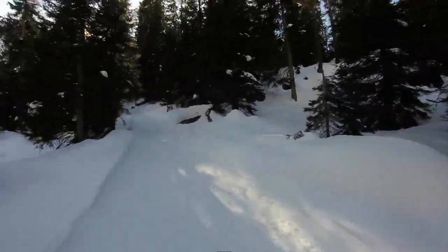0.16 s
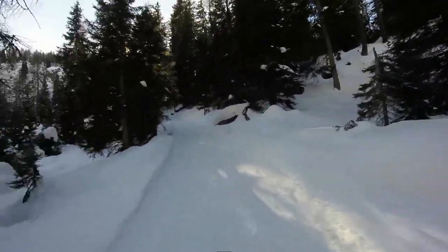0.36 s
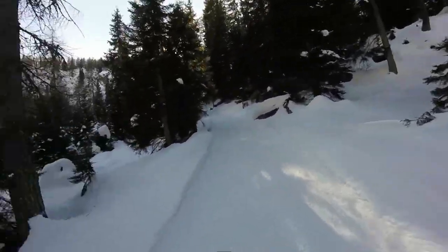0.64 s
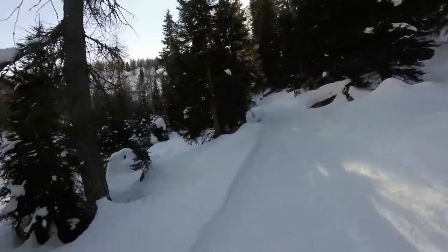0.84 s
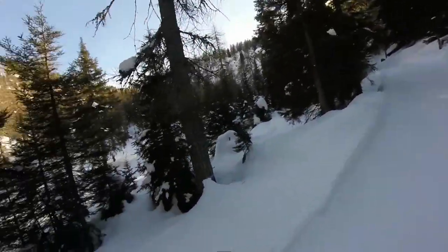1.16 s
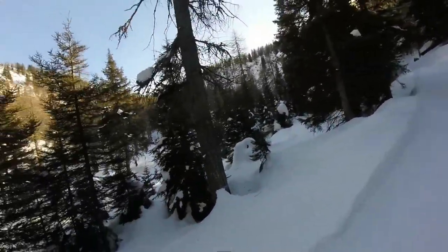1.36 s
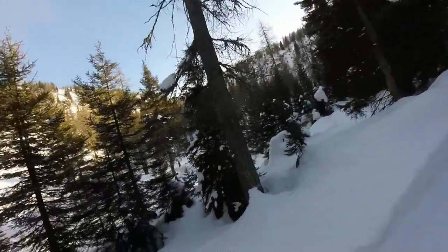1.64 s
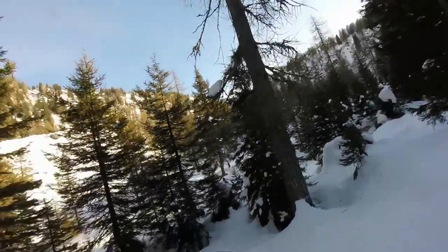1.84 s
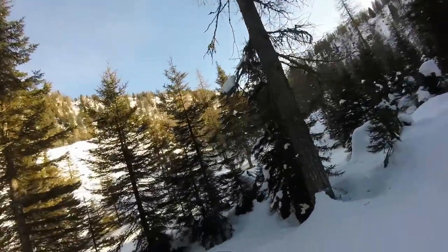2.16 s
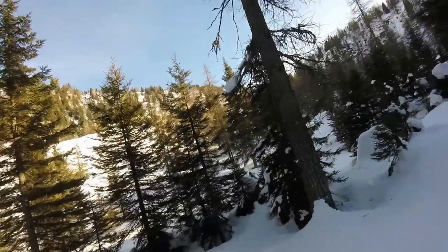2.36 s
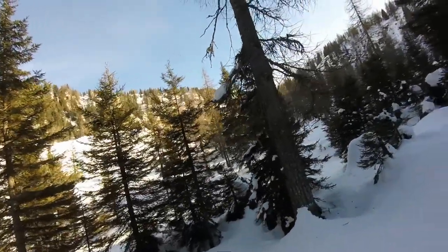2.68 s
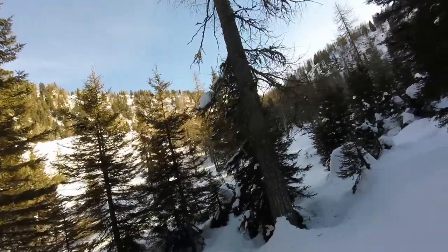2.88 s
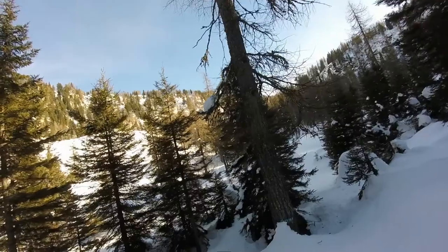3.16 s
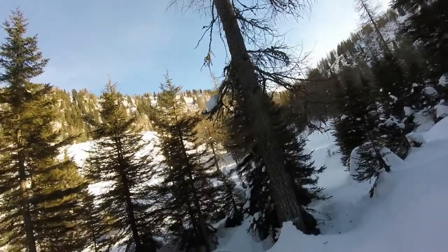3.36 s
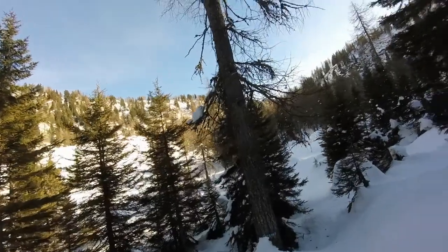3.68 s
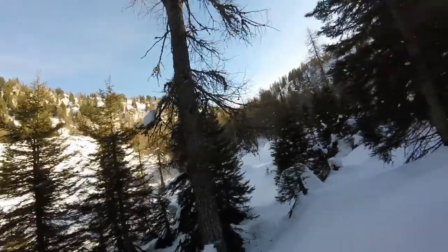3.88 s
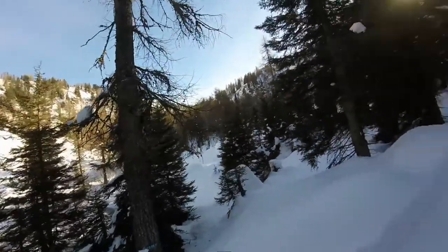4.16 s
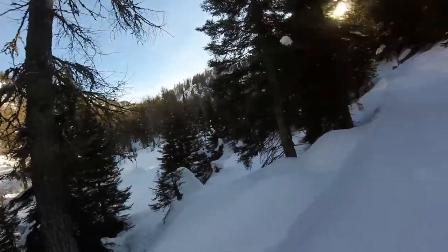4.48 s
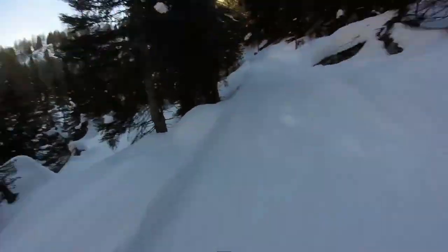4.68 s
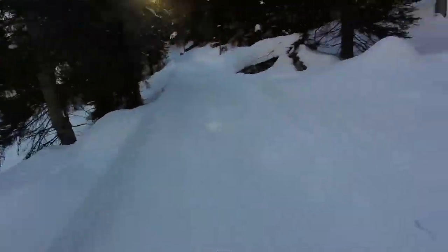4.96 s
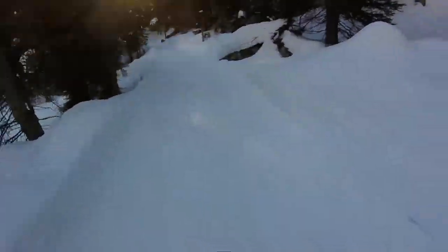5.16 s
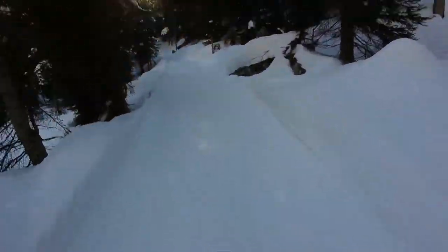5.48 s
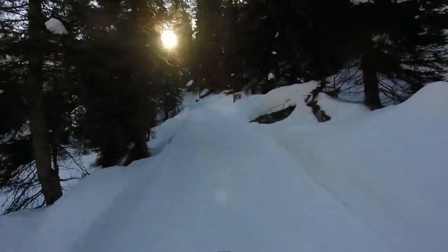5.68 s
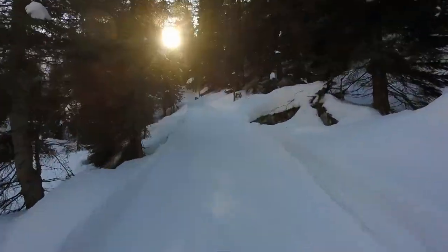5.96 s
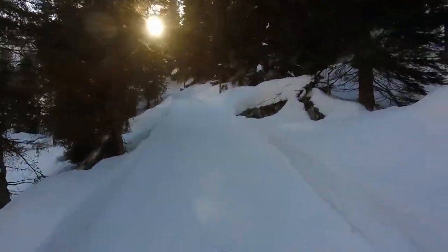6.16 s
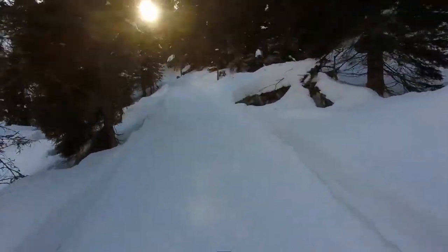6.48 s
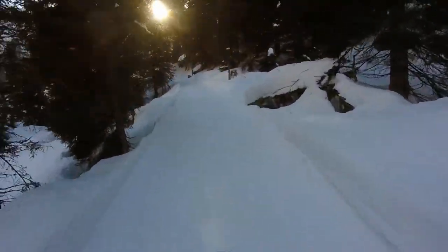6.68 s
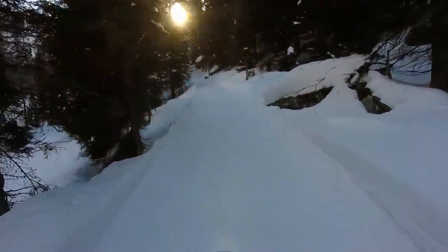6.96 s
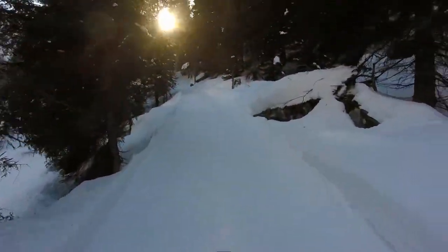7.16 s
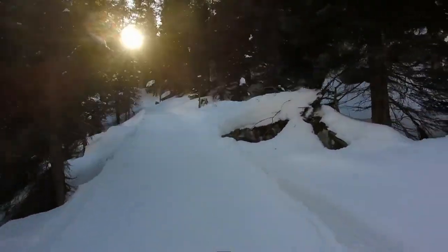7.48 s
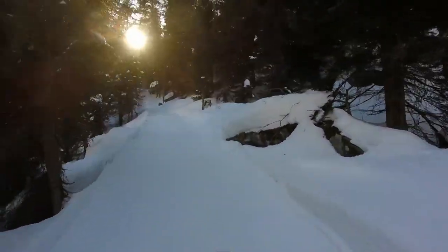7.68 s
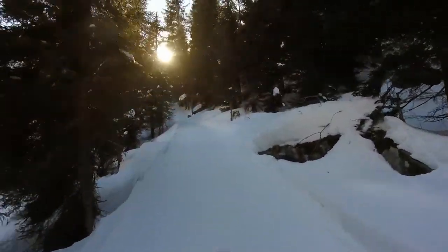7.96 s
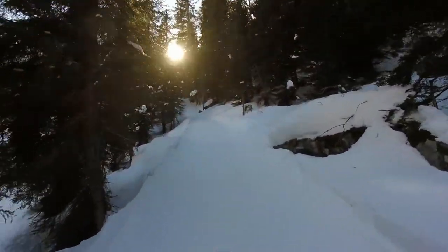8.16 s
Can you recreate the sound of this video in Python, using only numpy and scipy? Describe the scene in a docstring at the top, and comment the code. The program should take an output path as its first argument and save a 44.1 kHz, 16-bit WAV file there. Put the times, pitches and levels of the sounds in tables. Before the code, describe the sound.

One person walks a quiet snowy forest trail, boots clicking and crunching about every 0.6 seconds, while the carried camera rumbles softly.

```python
"""Footsteps on packed snow

Someone walks along a trail of cold packed snow with a camera in a closed plastic case.
Each footfall starts with a sharp click, a hard break and a brief slip, and sinks on in a squeaky crunch of
clumped grains; the case colours both with its resonances. A few landings add a short pitched chirp.
The walker's sway shakes the camera into a low rumble of shaped noise, with brief low swings for the jolts.
A faint steady hiss of shaped noise lies underneath."""
import sys
import numpy as np
from scipy import signal
from scipy.fft import rfft, irfft, next_fast_len
from scipy.io import wavfile
from scipy.ndimage import uniform_filter1d, map_coordinates

SR = 44100
rng = np.random.default_rng(int(sys.argv[2]) if len(sys.argv) > 2 else 0)


def store_pcm(level_fs):
    """Save levels as 16-bit WAV."""
    pcm = np.round(np.clip(level_fs, -1, 1) * 32767).astype(np.int16)
    wavfile.write(sys.argv[1], SR, np.atleast_2d(pcm).T)


N = 366912

# Colour of still air and microphone noise: frequency_hz, relative_level_db
HISS_COLOUR = [(20, 14.5), (90, 2.5), (160, 3), (300, 1), (600, -2), (1100, -6), (2000, -9.5), (4000, -14),
               (6400, -18), (9500, -23), (12000, -27), (15000, -37.5)]
# Rustle of walking, before its hush and drift: start_s, level_db
RUSTLE = [(0, -66.5), (.75, -71), (1.5, -66.5), (2.3, -71.5), (3, -68.5), (3.6, -72.5), (4.3, -69.5),
          (5, -67), (5.65, -68), (6.3, -70.5), (6.9, -69), (7.5, -65.5), (8.3, -67.5)]
# Colour of the camera's quick shiver: frequency_hz, relative_level_db
SHIVER_COLOUR = [(10, -59), (25, -0.5), (40, -7.5), (52, -7), (62, -5.5), (80, -21), (110, -31), (180, -45),
                 (400, -55), (900, -120)]
# Colour of the camera's slow sway: frequency_hz, relative_level_db
SWAY_COLOUR = [(8, -28), (20, -1), (35, -4.5), (48, -2.5), (65, -14.5), (100, -26), (180, -35.5),
               (400, -42), (900, -120)]
# Colour of the case knocked in the hand: frequency_hz, relative_level_db
THUD_COLOUR = [(25, -38), (45, -7), (62, 1.5), (85, -11), (120, -23.5), (200, -29), (500, -75)]
# Share of quick shiver, as against slow sway: start_s, share_0_to_1
STIFFNESS = [(0, 0.2), (1.2, 0.16), (2.2, 0.93), (3.4, 1), (4.6, 0.61), (5.3, 0), (8.3, 0)]
# Thumps that jolt the camera: centre_s, swing_peak_db, pitch_hz, half_length_s
JOLTS = [(0.08, -38, 45.3, 0.036), (0.506, -34, 53.3, 0.028), (0.578, -27.5, 29.2, 0.017),
         (1.152, -28.5, 28, 0.014), (1.203, -32.5, 23, 0.021), (1.67, -25.5, 47, 0.018),
         (1.713, -25, 42.7, 0.019), (2.191, -29, 57, 0.034), (2.255, -27.5, 52.5, 0.036),
         (2.707, -32, 48, 0.019), (2.853, -21.5, 54.7, 0.027), (2.974, -28, 49, 0.01),
         (3.078, -30, 43.7, 0.021), (3.454, -34.5, 51.7, 0.046), (3.481, -27.5, 35.5, 0.032),
         (4.046, -27.5, 43, 0.036), (4.428, -38.5, 35.2, 0.039), (4.651, -36, 41, 0.041),
         (4.724, -39.5, 45, 0.029), (4.82, -35, 25.5, 0.023), (5.366, -31.5, 26.4, 0.012),
         (5.445, -34.5, 27, 0.035), (6.029, -31.5, 26.6, 0.025), (6.58, -31, 38.4, 0.016),
         (6.647, -34, 27.3, 0.013), (7.01, -37.5, 48.7, 0.012), (7.759, -25, 35.7, 0.0088)]
# Resonances of the camera case: pitch_hz, width_hz, gain_db
CASE = [(1383, 144, -2), (1577.6, 177, 6.5), (1643, 190, 1.5), (2024, 155, -1.5), (2330, 128, 2.5),
        (2553, 126, 2.5), (2771, 69, 2), (2992, 118, 2), (3562, 147, -1.5), (3962, 108, 1),
        (4600, 310, -13.5), (5350, 73, -20), (5650, 370, -28), (6370, 110, -13), (9450, 480, -23)]
# Low, middle, bright and snap bands of a click's ring: bottom_hz, top_hz
RING_BANDS = [(1200, 1870), (1870, 3320), (3320, 4250), (4250, 8000)]
# The part of a click that comes straight through the case wall: bottom_hz, top_hz
CRACK_BAND = (690, 3750)
# Colour of breaking snow grains: frequency_hz, gain_db
GRAIN_COLOUR = [(500, -12), (1100, -6.5), (1500, 3.5), (1900, 0.5), (2400, -1.5), (3000, -5.5), (4000, -9),
                (6400, 2.5), (10000, -13), (15000, -43)]
# Colour of loose crystals: frequency_hz, gain_db
POWDER_COLOUR = [(900, 2), (2000, -4), (4500, -14), (7000, -13.5), (10000, -6.5), (15000, -54)]
# Treble of the snow along the trail, before its flicker: start_s, gain_db
CRISPNESS = [(.5, 2.5), (1.1, 0), (1.6, 3), (3.4, 3.5), (5.3, 1), (6.5, -0.5), (8.2, -1)]
# Small scuffs of snow between the landings: centre_s, level_db, spread_s
SCUFFS = [(0.296, -62.5, 0.0041), (0.406, -61, .006), (0.513, -56, 0.011), (0.565, -61, .002),
          (0.652, -59, 0.0055), (0.695, -59, .005), (.735, -61, .003), (0.962, -64, .005),
          (1.087, -59, .003), (1.096, -55, .003), (1.679, -57, 0.0064), (2.04, -62, 0.019),
          (2.16, -61, .007), (2.972, -58, 0.0034), (4.519, -61, .003), (4.553, -63, 0.0095),
          (4.79, -61, .012), (5.297, -55, .007), (5.418, -56.5, 0.0068), (5.533, -57.5, 0.006),
          (6.113, -63, .005), (6.356, -61.5, 0.016), (6.4, -61, 0.0044), (6.609, -58.5, 0.01),
          (6.662, -58.5, 0.0044), (6.743, -60, .005), (7.002, -58, 0.0062), (7.112, -57, .005),
          (7.18, -60, 0.014), (7.377, -62, .005), (7.527, -61.5, .006), (7.86, -62, 0.0054)]
# Footfalls, all levels set against each other: landing_s, low_ring_db, middle_ring_db, bright_ring_db,
# snap_db, low_ring_hz, middle_ring_hz, snap_hz, relative_slip_s, scuff_before_landing_db, crunch_db,
# creak_under_full_weight_db, camera_shake_db
STEPS = [(0.4622, -49, -42.5, -56, -61, 1410, 2630, 4480, 0.0025, -73, -54, -64, -41.5),
         (1.049, -35.5, -37, -47, -55, 1540, 2850, 4870, 0.0031, -80, -52, -85, -39),
         (1.6206, -45, -40, -55.5, -55.5, 1290, 2120, 4530, 0.0027, -77, -56.5, -65.5, -37),
         (2.196, -45, -40.5, -48.5, -56.5, 1410, 1900, 6000, 0.0024, -82, -54.5, -67.5, -36.5),
         (2.82, -56, -48, -50.5, -67, 1480, 2470, 4500, 0.00057, -72, -58, -67, -34.5),
         (3.3947, -44, -45.5, -51.5, -58, 1740, 2380, 6200, 0.0026, -66.5, -56.5, -88, -31),
         (3.999, -51, -46.5, -54, -66, 1660, 2650, 5200, 0.0018, -66, -59, -71, -38),
         (4.606, -39.5, -39.5, -47, -57, 1400, 2550, 6570, 0.0037, -67, -53, -62.5, -40.5),
         (5.263, -41.5, -41, -45, -56, 1370, 2550, 5330, 0.0016, -60.5, -53, -66, -46),
         (5.8589, -38.5, -41.5, -50, -56, 1590, 2250, 4860, 0.0035, -63.5, -53.5, -59, -44),
         (6.4658, -40.5, -48.5, -49, -59, 1420, 2850, 6100, 0.0018, -82, -50, -69, -44.5),
         (7.0466, -38.5, -45, -48.5, -59, 1510, 2550, 6700, 0.0031, -82, -51.5, -74, -44),
         (7.647, -48, -43.5, -53, -64, 1320, 2700, 5000, 0.0015, -79, -53, -82, -47.5),
         (8.2012, -38.5, -38.5, -47.5, -57, 1500, 2560, 5130, 0.0031, -79, -54, -76, -46.5)]
# Further cracks as the crust gives way: start_s, low_ring_db, middle_ring_db, bright_ring_db, snap_db,
# low_ring_hz, relative_slip_s
CRACKS = [(0.486, -47.5, -50, -68, -68, 1410, 0.0053), (0.5001, -44.5, -43, -56.5, -60, 1620, 0.0044),
          (0.7446, -58.5, -56, -76, -72, 1590, 0.0035), (1.355, -60.5, -57, -72, -74, 1560, 0.0018),
          (1.648, -51, -47, -58, -61, 1600, 0.0017), (3.405, -56, -57, -64, -62, 1440, 0.0081),
          (4.6314, -50, -51.5, -69, -71, 1410, 0.0016), (5.251, -52, -58, -77, -81, 1500, 0.0028),
          (5.272, -57, -45, -67, -68, 1500, 0.0031), (5.364, -57, -64, -79, -80, 1510, 0.0077),
          (5.575, -61.5, -61, -80, -74, 1470, 0.0033), (6.264, -69, -66, -64.5, -70, 1500, 0.0083),
          (6.485, -46.5, -62, -55, -68, 1500, 0.0061), (6.501, -53.5, -56, -72, -72, 1540, 0.01),
          (6.805, -64, -64, -73, -76, 1620, 0.0031), (7.056, -56, -48, -60, -71, 1360, 0.0018),
          (7.657, -53, -56, -61, -67, 1570, 0.0051), (7.672, -46.5, -53, -71, -81, 1450, 0.0022),
          (8.212, -56, -53, -57, -72, 1400, 0.0024), (8.229, -52, -55, -69, -73, 1600, 0.003)]
# Landings where the sole sticks and slips evenly enough to squeak: start_s, pitch_hz, peak_db
SQUEAKS = [(5.262, 2745, -25), (6.465, 2810, -30.5), (7.0465, 2750, -32.5)]

TOP_HZ = 15000  # the camera's band limit
LEAD_S = 0.003  # room ahead of a click for its onset
# The rustle drops while the leg swings through the air
HUSH_LEAD_S, HUSH_S, HUSH_DB = 0.1, 0.036, -6
# The crunch falls still while the crust holds, just before it cracks
STICK_LEAD_S, STICK_S, STICK_DB = 0.0062, 0.006, -6.5
# Later cracks ring the bottom of the middle and top bands
CRACK_MIDDLE_HZ, CRACK_SNAP_HZ = 2300, 4730
# How widely a click spreads around its own three pitches
LOW_FOCUS_HZ, MIDDLE_FOCUS_HZ, SNAP_FOCUS_HZ = 270, 1100, 1350


def amp(db):
    """Decibels to gain."""
    return 10 ** (np.asarray(db) / 20)


def unit(x):
    """x at rms 1."""
    return x / np.sqrt(np.mean(x ** 2) + 1e-20)


def curve(rows):
    """(s, value) rows as one value per sample."""
    return np.interp(np.arange(N) / SR, *np.transpose(rows))


def wobble(rate):
    """A smooth random curve, rate knots a second."""
    knots = rng.standard_normal(int(N * rate / SR) + 4)
    return map_coordinates(knots, [np.arange(N) * rate / SR])


def bell(t, half_s):
    """A smooth rise and fall around t = 0."""
    return np.exp(-(t / half_s) ** 2)


def filtered(x, response):
    """x times a complex response of frequency."""
    m = next_fast_len(len(x) + 8192)  # spare room for the ringing
    return irfft(rfft(x, m) * response(np.fft.rfftfreq(m, 1 / SR)), m)[:len(x)]


def lowpass(hz, corner_hz, order):
    """Gain that rolls off smoothly above a corner."""
    return 1 / (1 + (hz / corner_hz) ** order)


def coloured(x, points):
    """x shaped by (Hz, dB) points on a log axis."""
    f, db = np.transpose(points)
    return filtered(x, lambda hz: amp(np.interp(np.log(hz + 1), np.log(f + 1), db)))


def focused(x, centre_hz, width_hz):
    """x with the frequencies around one pitch favoured."""
    return filtered(x, lambda hz: 1 / (1 + ((hz - centre_hz) / width_hz) ** 2))


def add(track, s, sound):
    """Mix a sound into the track from time s."""
    part = track[max(0, round(s * SR)):][:len(sound)]
    part += sound[:len(part)]


def hiss(level_db=-60.0):
    """Steady background of still air and microphone noise."""
    return amp(level_db) * unit(coloured(rng.standard_normal(N), HISS_COLOUR))


def rustle_level(drift_db=4.0, drift_rate=35):
    """Level of the faint rustle of walking, quieter in the swing of each stride."""
    t = np.arange(N) / SR
    hush = sum(bell(t - s + HUSH_LEAD_S, HUSH_S) for s, *_ in STEPS)
    return amp(curve(RUSTLE) + HUSH_DB * hush + drift_db * wobble(drift_rate))


def stride_shake(stiff_delay_s=0.048, loose_delay_s=0.067, rise_db_per_s=150, fall_db_per_s=55,
                 swing_db=-11, swing_lead_s=0.062, swing_s=0.07,
                 rest_db=-56, lull_db=-5, lull_delay_s=0.313, lull_s=0.06):
    """Shake stirs in the leg swing, peaks after landing (sooner if held stiffly), lulls in mid-stride."""
    t, power, lull = np.arange(N) / SR, amp(rest_db) ** 2, 0
    for s, *_, shake_db in STEPS:
        stiffness = np.interp(s, *np.transpose(STIFFNESS))
        delay_s = loose_delay_s - stiffness * (loose_delay_s - stiff_delay_s)
        late = t - s - delay_s
        landing = amp(np.minimum(rise_db_per_s * late, -fall_db_per_s * late))
        swing = amp(swing_db) * bell(t - s + swing_lead_s, swing_s)
        power = power + amp(shake_db) ** 2 * (landing ** 2 + swing ** 2)
        lull = lull + bell(t - s - lull_delay_s, lull_s)
    return np.sqrt(power) * amp(lull_db * lull)


def handling(shake_db=2.0, thud_db=-17, evenness=0.56, lump_db=3, lump_rate=13, takeover=0.48):
    """The camera shudders unevenly with the stride; a jolt swings it briefly and thuds the case."""
    shiver = unit(coloured(rng.standard_normal(N), SHIVER_COLOUR))
    sway = unit(coloured(rng.standard_normal(N), SWAY_COLOUR))
    thud = unit(coloured(rng.standard_normal(N), THUD_COLOUR))
    share = np.clip(curve(STIFFNESS), 0, 1)
    shudder = np.sqrt(share) * shiver + np.sqrt(1 - share) * sway
    # Partly even out the noise's own swells so that the stride sets them
    swell = np.sqrt(np.abs(uniform_filter1d(shudder ** 2, size=SR // 14)) + 1e-4)
    lumps = amp(lump_db * np.minimum(wobble(lump_rate), 1))
    shudder = amp(shake_db) * stride_shake() * unit(lumps * shudder / swell ** evenness)

    swings, busy, t = np.zeros(N), np.zeros(N), np.arange(N) / SR
    for s, db, hz, half_s in JOLTS:
        window = np.exp(-np.minimum(((t - s) / half_s) ** 2, 40))
        swing = np.cos(2 * np.pi * hz * (t - s))
        swings += amp(db) * (swing + amp(thud_db) * thud) * window
        busy += np.sqrt(window)
    # A jolt takes over the motion while it lasts
    return swings + shudder * np.clip(1 - takeover * busy, 0, 1)


def through_case(x):
    """Sound rings the walls and the air space of the case: resonances summed in alternating polarity."""
    def response(f):
        total = 0
        for k, (centre, width, db) in enumerate(CASE):
            damping = 1j * f * width
            total = total + (-1) ** k * amp(db) * damping / (centre ** 2 - f ** 2 + damping)
        return total
    return filtered(x, response)


def grains(size, rate, spread_db):
    """Ice bonds breaking at random, rate a second, a few much harder than the rest."""
    breaks = rng.random(size) < rate / SR
    polarity = rng.choice([-1, 1], size)
    force = amp(spread_db * np.minimum(rng.exponential(size=size), 4))
    return unit(breaks * polarity * force)


def snow_power(scuff_s=0.15, crunch_peak_db=4.5, crunch_rise_s=0.012, crunch_t60_s=0.39,
               creak_delay_s=0.12, creak_s=0.095):
    """A boot brushes in, sinks into the crust, then creaks under rolling weight; small scuffs fall between."""
    power, t = np.zeros(N), np.arange(-SR // 4, SR // 2) / SR
    for s, *_, scuff_db, crunch_db, creak_db, _ in STEPS:
        scuff = amp(scuff_db) * bell(t, scuff_s) * (t < 0)
        decay = amp(crunch_db + crunch_peak_db - 60 * np.abs(t) / crunch_t60_s)
        crush = decay * np.clip(t / crunch_rise_s, 0, 1)
        creak = amp(creak_db) * bell(t - creak_delay_s, creak_s)
        add(power, s + t[0], scuff ** 2 + crush ** 2 + creak ** 2)
    for s, db, spread_s in SCUFFS:
        add(power, s + t[0], (amp(db) * np.exp(-(t / spread_s) ** 2 / 2)) ** 2)
    return power


def sticking():
    """Gain of the crunch: it stalls while the load builds up to a crack."""
    t = np.arange(N) / SR
    held = sum(np.exp(-np.minimum(((t - s + STICK_LEAD_S) / STICK_S) ** 2, 40)) for s, *_ in CRACKS)
    return amp(STICK_DB * np.minimum(held, 1))


def coarse_grains(rate, scatter):
    """Heavier grains crackle at uneven intervals, whenever a jittery phase passes a whole turn."""
    turns = np.cumsum(np.exp(scatter * wobble(200)) * rate / SR)
    breaks = np.diff(np.floor(turns + wobble(300) / 2), prepend=0)
    force = amp(1.7 * np.clip(rng.standard_normal(N), -2, 1))
    return unit(breaks * force) * rng.choice([-1, 1], N)


def crunch(grain_rate=1800, clump_db=3.0, clump_rate=150, crisp_hz=3200,
           coarse_rate=170, coarse_db=-1.0, coarse_scatter=0.45,
           seesaw_db=2.5, seesaw_rate=55, powder_db=-10.0):
    """Fine fractures clump as snow sticks and slips, coarse ones crackle; crisper snow has more treble."""
    level = np.sqrt(snow_power() * sticking() ** 2 + rustle_level() ** 2)
    clumps = amp(clump_db * np.minimum(wobble(clump_rate), 1))
    fine = unit(grains(N, grain_rate, spread_db=2.0) * clumps)
    coarse = amp(coarse_db) * coarse_grains(coarse_rate, coarse_scatter)
    fracture = coloured(fine + coarse, GRAIN_COLOUR)

    treble = filtered(fracture, lambda hz: 1 - lowpass(hz, crisp_hz, 8))
    low = filtered(fracture, lambda hz: lowpass(hz, RING_BANDS[0][1], 14))
    middle = fracture - low - treble
    # The creak leans now on the low ring, now on the middle one
    lean = amp(seesaw_db * np.clip(wobble(seesaw_rate), -1.5, 1.5))
    creak = low * lean + middle / lean
    crispness = amp(curve(CRISPNESS) + 2.55 * wobble(30))  # the treble flickers
    squeaky = through_case(level * (creak + crispness * treble)) / np.std(through_case(fracture))
    # Loose crystals add a dry fizz
    fizz = amp(powder_db) * level * crispness * unit(coloured(fracture, POWDER_COLOUR))
    return squeaky + fizz


def squeaks(rise_s=0.0017, t60_s=0.0068):
    """A sole sticking and slipping evenly: a short decaying sine on top of the click."""
    out, t = np.zeros(N), np.arange(SR // 20) / SR
    for s, hz, db in SQUEAKS:
        swell = (1 - bell(t, rise_s)) * amp(-60 * t / t60_s)
        add(out, s, amp(db) * swell / swell.max() * np.sin(2 * np.pi * hz * t))
    return out


def click(ring_db, low_hz, middle_hz, snap_hz, slip_s,
          first_blow=5.6, slip_rate=9000, slip_stretch=1.5, edge_s=0.00021, crack_db=-12.0):
    """One hard break and a brief slip, ringing the case with its own balance and pitch."""
    t, lead = np.arange(SR // 20) / SR, round(LEAD_S * SR)
    slip_window = np.exp(-(t / max(slip_s * slip_stretch, 1e-3)) ** 4)
    slip = grains(len(t), slip_rate, spread_db=1.5) * slip_window
    slip[0] += first_blow
    wall = signal.butter(2, CRACK_BAND, "bandpass", fs=SR, output="sos")
    crack = amp(crack_db) * unit(signal.sosfilt(wall, slip))
    ring = np.pad(unit(through_case(slip)) + crack, (lead, 0))

    low, middle, bright, snap = (
        filtered(ring, lambda hz: lowpass(hz, top, 14) - lowpass(hz, bottom, 14))
        for bottom, top in RING_BANDS)
    snap = filtered(snap, lambda hz: 1 - lowpass(hz, RING_BANDS[-1][0], 40))
    parts = (focused(low, low_hz, LOW_FOCUS_HZ), focused(middle, middle_hz, MIDDLE_FOCUS_HZ),
             bright, focused(snap, snap_hz, SNAP_FOCUS_HZ))
    # Each band's level is set over the first 10 ms
    mix = sum(amp(db) * part / np.std(part[lead:][:SR // 100]) for db, part in zip(ring_db, parts))
    since_break = (np.arange(len(ring)) - lead) / SR
    onset = 1 / (1 + np.exp(-np.clip(since_break / edge_s, -30, 30)))  # the break starts abruptly
    return onset * mix


def clicks():
    """Every boot lands with a click, and now and then the crust cracks again."""
    out = np.zeros(N)
    for s, low_db, middle_db, bright_db, snap_db, low_hz, middle_hz, snap_hz, slip_s, *_ in STEPS:
        ring_db = (low_db, middle_db, bright_db, snap_db)
        add(out, s - LEAD_S, click(ring_db, low_hz, middle_hz, snap_hz, slip_s))
    for s, low_db, middle_db, bright_db, snap_db, low_hz, slip_s in CRACKS:
        ring_db = (low_db, middle_db, bright_db, snap_db)
        add(out, s - LEAD_S, click(ring_db, low_hz, CRACK_MIDDLE_HZ, CRACK_SNAP_HZ, slip_s))
    return out


def scene():
    """Background, camera shake and footfalls in one channel."""
    return (hiss() + handling() + crunch() + squeaks() + clicks())[None]


def record(dry):
    """The camera keeps nothing above its band limit."""
    return np.array([filtered(x, lambda hz: hz < TOP_HZ) for x in dry])


dry = scene()
out = record(dry)
store_pcm(out)
```